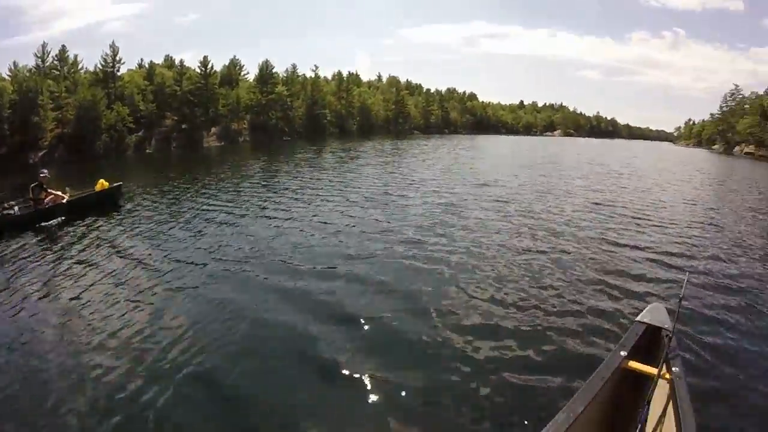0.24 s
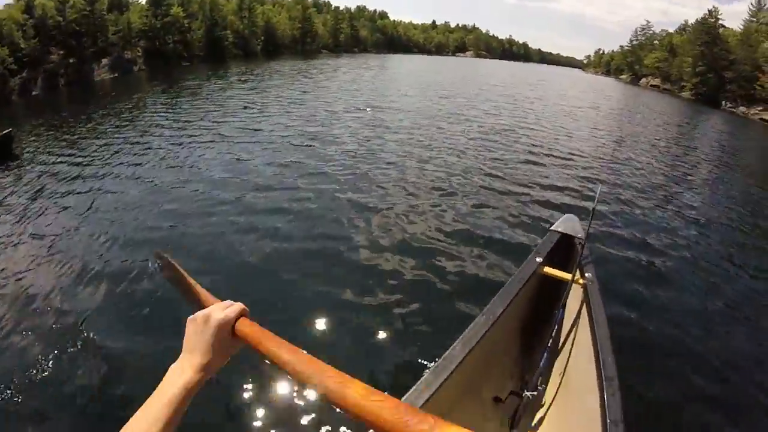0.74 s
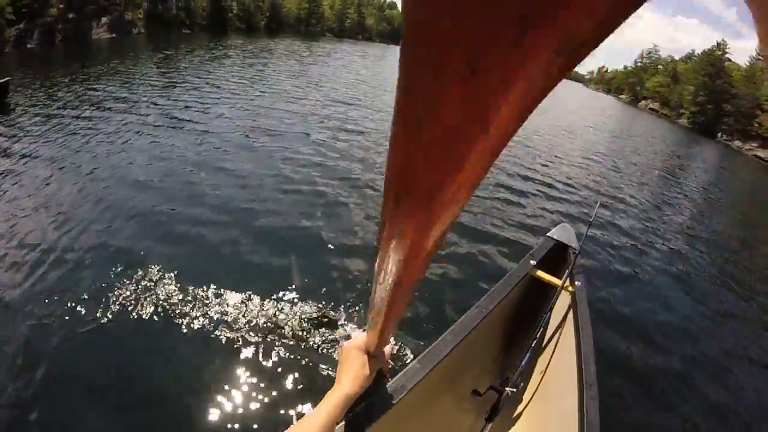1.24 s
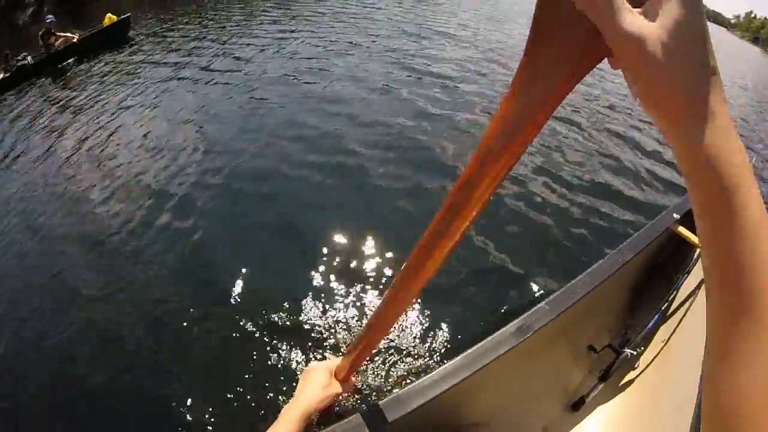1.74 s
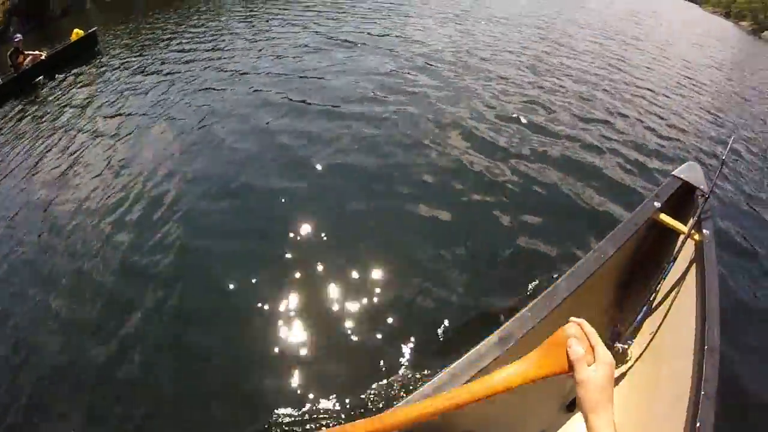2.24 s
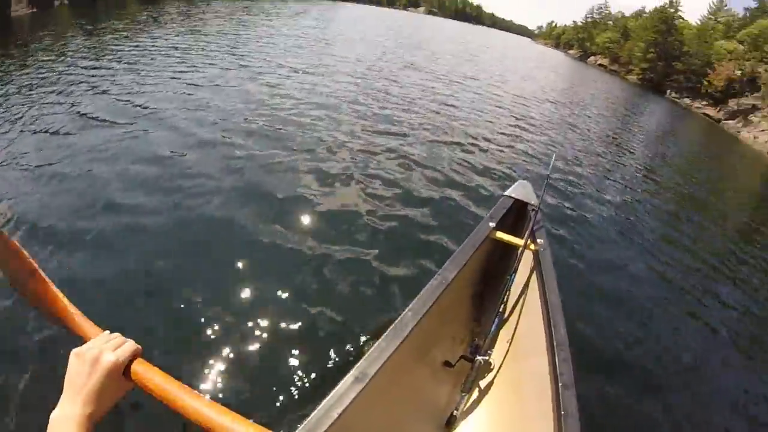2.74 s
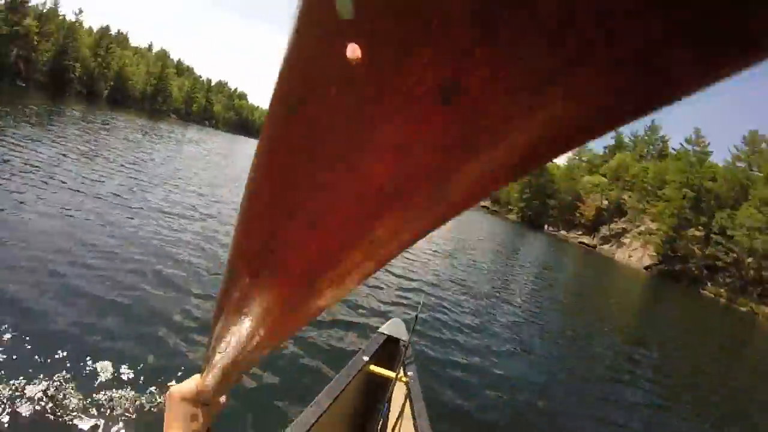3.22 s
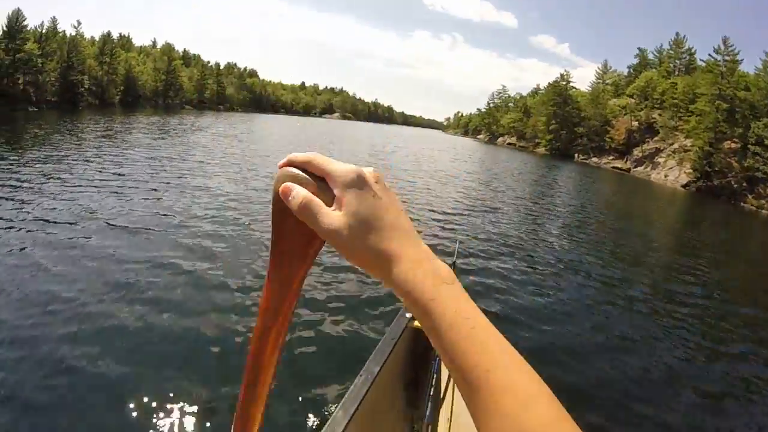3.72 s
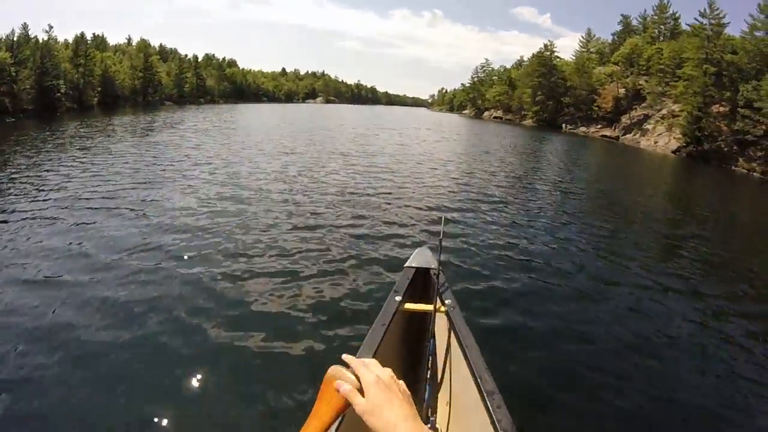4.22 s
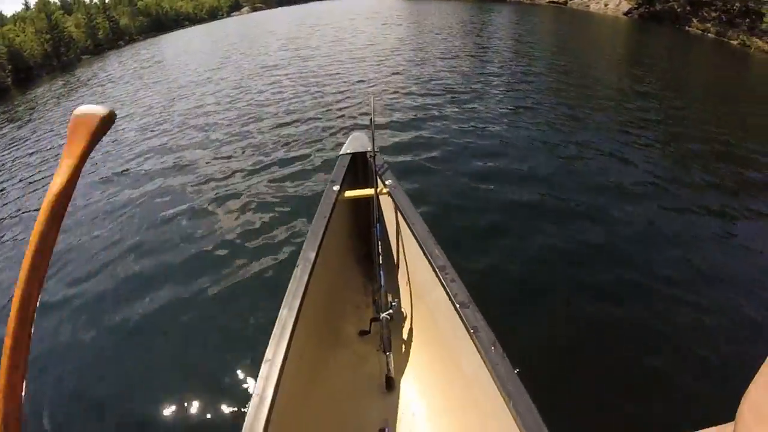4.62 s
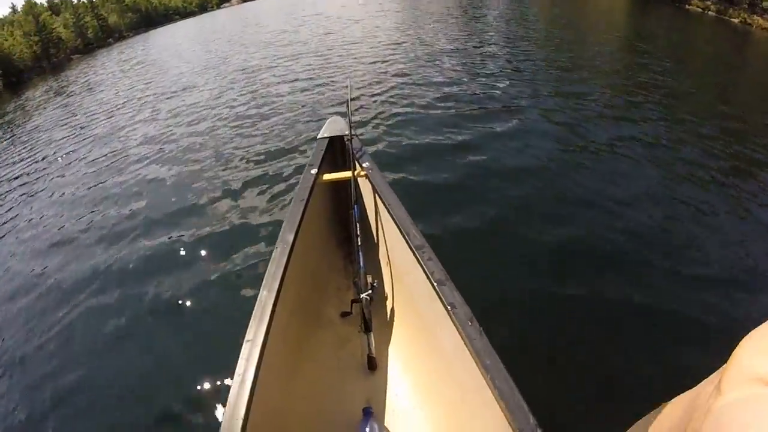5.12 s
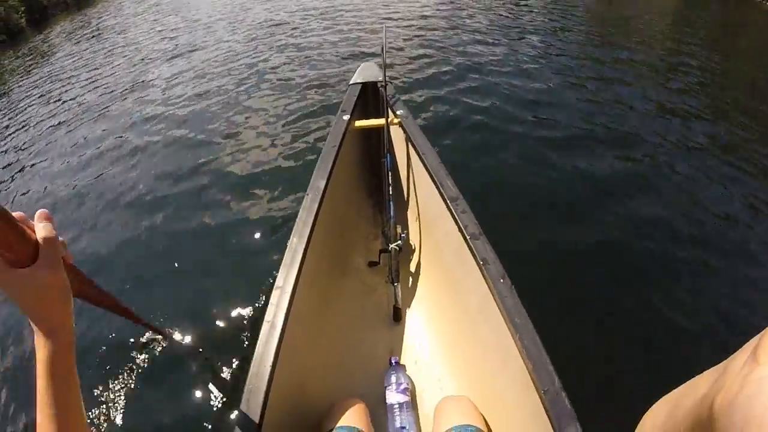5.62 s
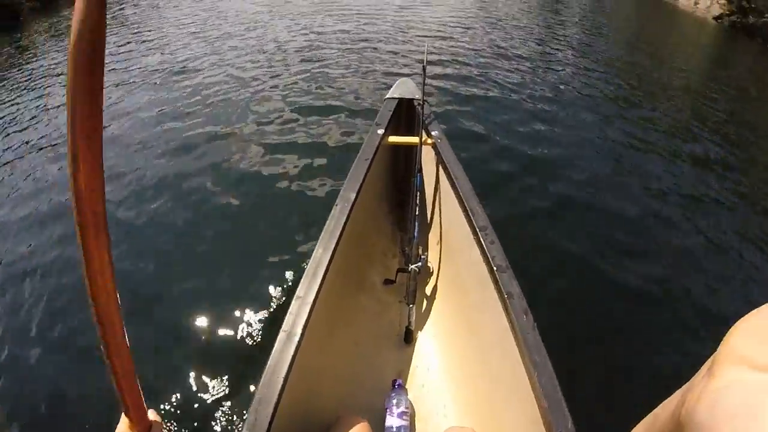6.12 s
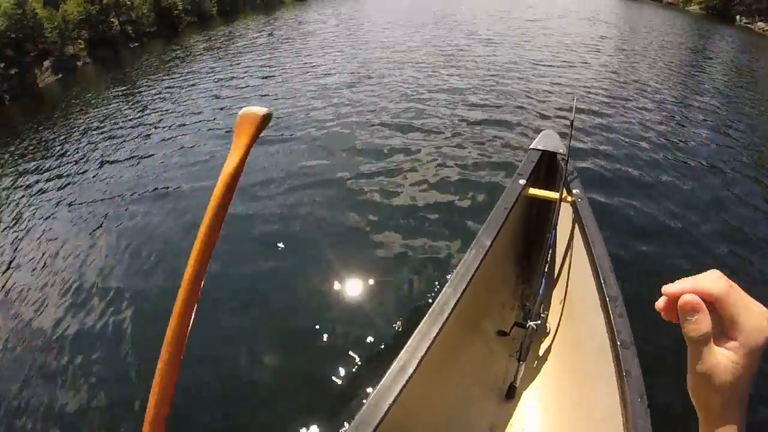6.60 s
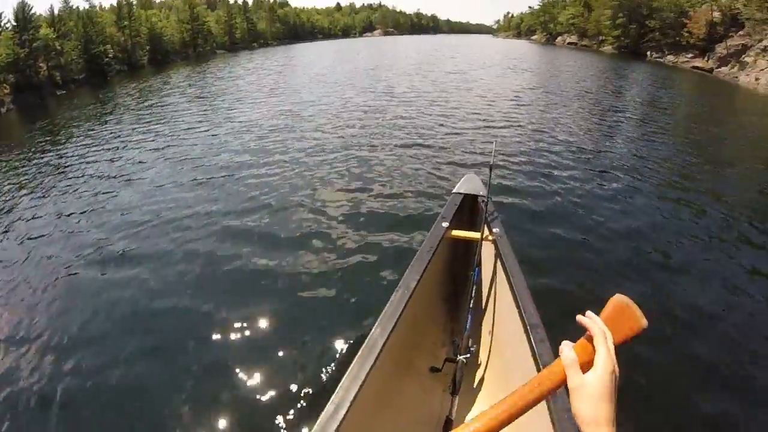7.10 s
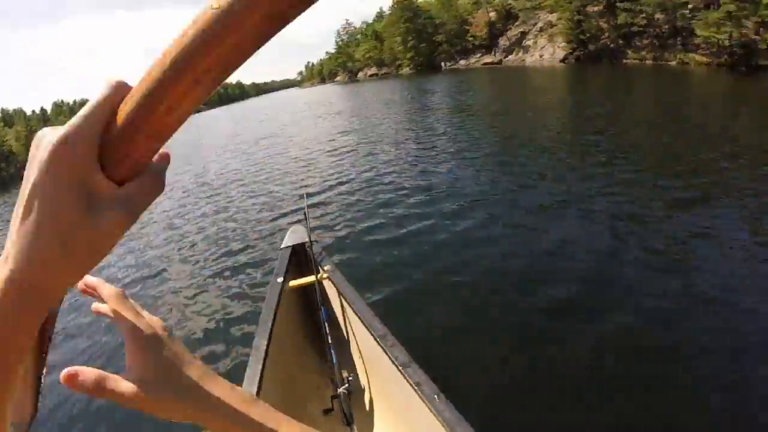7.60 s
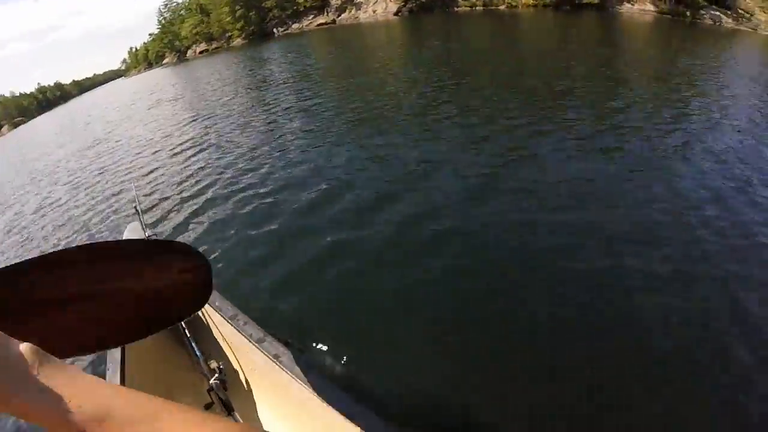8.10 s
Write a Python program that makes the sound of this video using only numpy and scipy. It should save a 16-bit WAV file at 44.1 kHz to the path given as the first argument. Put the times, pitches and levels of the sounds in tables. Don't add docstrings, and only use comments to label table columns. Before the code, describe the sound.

Steady muffled hiss and low uneven rumble fill the first three seconds, as from a sealed microphone on a moving canoe. A faint tap sounds at 0.1, tiny ticks around 0.8, a soft bump and small drips at 1.3 to 1.5, and dull bumps near 2.3. At 3.25 a hard, loud wooden blow hits with a deep pressure thump, bouncing dryly until 3.4; the hiss dips, then creeps back. A light clicking rattle runs along the hull edge from 3.9 to 4.1. From 4.6 close, gritty rubbing slides over the case, surging firmly near 4.9 and 5.25, with thumps, grabs and brief squeaks, then breaking into stuttering ticks from 5.4 to 5.95. Two sharp knocks at 6.15 and 6.18, the first loudest, end in a short brush by 6.3. Quiet hiss and rumble remain, with faint taps at 6.7, 7.1, 7.8 and 8.1.

```python
import sys
import numpy as np
from scipy import signal
from scipy.fft import rfft, irfft
from scipy.io import wavfile
from scipy.ndimage import uniform_filter1d

SR = 44100
rng = np.random.default_rng(int(sys.argv[2]) if len(sys.argv) > 2 else 0)


def wav_out(sig):
    wavfile.write(sys.argv[1], SR, np.round(np.clip(np.atleast_2d(sig).T, -1, 1) * 32767).astype(np.int16))


def volts_from_db(level):
    exponent = np.asarray(level, float) / 20
    return 10 ** exponent


N = 368235


def evened(x):
    return x / np.sqrt(np.mean(x ** 2) + 1e-20)


def add(mix, start_s, sound):
    part = mix[round(start_s * SR):][:len(sound)]
    part += sound[:len(part)]


def band(x, lo_hz, hi_hz, order=2):
    return signal.sosfilt(signal.butter(order, [lo_hz, hi_hz], "band", fs=SR, output="sos"), x)


def resonances(x, modes):
    out = 0
    for k, (hz, width_hz, db) in enumerate(modes):
        out = out + (-1) ** k * volts_from_db(db) * signal.lfilter(*signal.iirpeak(hz, hz / width_hz, SR), x)
    return out


def coloured(points):
    hz, db = np.transpose(points)
    bins_hz = np.fft.rfftfreq(N, 1 / SR)
    shape = volts_from_db(np.interp(np.log(bins_hz + 1), np.log(hz + 1), db))
    return evened(irfft(rfft(rng.standard_normal(N)) * shape, N))


# frequency in Hz, density in dB per Hz.
HISS_SPECTRUM = [(35, -31), (60, -7), (270, -9.5), (500, -13.5), (1300, -18), (3300, -25), (5000, -30.5),
                 (7500, -34.5), (11000, -42.5), (15000, -47.5), (15100, -90)]


def hiss(loud):
    level_db, recovery_db_per_s = -54.5, 18
    peak_db = 20 * np.log10(abs(loud) + 1e-5)
    fall_db = np.arange(N) * recovery_db_per_s / SR
    held_db = np.maximum.accumulate(peak_db + fall_db) - fall_db
    over_db = np.maximum(held_db + 8.5, 0)
    return volts_from_db(level_db - uniform_filter1d(over_db, size=200)) * coloured(HISS_SPECTRUM)


def felt(rows):
    s, db, jolt_db = np.transpose(rows)
    t = np.arange(N) / SR
    inside = (t >= s[0]) & (t <= s[-1])
    return inside * volts_from_db([np.interp(t, s, db), np.interp(t, s, db + jolt_db)])


# time in seconds, sway in dB, jolt in dB relative to sway.
SWAY = [(0, -46, -6.5), (0.3, -51, 1.5), (0.72, -46, -16), (1.0, -55.5, -1.5), (1.35, -46.5, -19.5),
        (2.2, -58.5, -1.5), (2.32, -51.5, -2.5), (2.75, -54.5, -7), (3.0, -42.5, -15), (3.245, -56.5, 1.5),
        (3.9, -47, -17.5), (4.08, -50, 7), (4.2, -48.5, -9.5), (4.6, -56.5, 1), (6.4, -50, -4),
        (6.9, -64, 2.5), (7.85, -49.5, -6.5), (8.35, -48.5, -29)]
# time in seconds, shove in dB, jolt in dB relative to shove.
SHOVES = [
    [(3.25, -45, -1), (3.259, -24, -9), (3.359, -31.5, -6.5), (3.41, -48, -7)],
    [(4.6, -66, -3), (4.638, -42, -2), (4.75, -43.5, -19), (4.95, -36, -8), (5.25, -48, 3),
     (5.4, -38.5, -11), (5.6, -43, 6), (5.9, -41.5, -17), (6.22, -39.5, -4.5)],
]


def rumble():
    sway, jolt = sum(felt(rows) for rows in [SWAY] + SHOVES)
    lumps = volts_from_db(4.1 * evened(band(rng.standard_normal(N), 3.3, 33, order=1)))
    deep = evened(band(rng.standard_normal(N), 8, 37) * np.sqrt(lumps))
    upper = evened(band(rng.standard_normal(N), 47.4, 130) * lumps)
    grind = evened(band(rng.standard_normal(N), 110, 283) * lumps)
    upper += volts_from_db(-9.5) * (jolt / volts_from_db(-49.5)) ** 0.2 * grind
    return sway * deep + jolt * upper


# start in seconds, peak in dB, swing in Hz (minus: pull before push),
# swings to die out.
THUMPS = [(2.285, -43, -49, 5.1), (2.332, -35.5, 76, 1.6), (3.2497, -3.5, 82, 0.34), (3.257, -19, -20, 1),
          (3.29, -34, -54, 0.8), (3.295, -18, 5.5, 0.66), (3.318, -12, -41, 0.9), (3.335, -17, -25.5, 1.2),
          (3.38, -13, -101, 0.36), (4.138, -36, -70, 1.2), (4.181, -34, 76, 0.52),
          (4.205, -34.5, -55, 0.92), (4.621, -29, -69, 0.77), (4.647, -6.5, -50, 0.32),
          (4.653, -13.5, 46, 0.95), (4.823, -32, 49, 1.4), (4.89, -29, 95, 2.5), (4.926, -21, 20, 0.79),
          (5.06, -12, 148, 0.75), (5.192, -17, -70, 0.36), (5.301, -15.5, 134, 0.51), (5.306, -17, 72, 1.8),
          (5.321, -9.5, -48, 0.4), (5.56, -21.5, -52, 0.81), (5.594, -16, -103, 0.37),
          (5.749, -33, -23.5, 3.7), (5.893, -22.5, 101, 0.62), (5.949, -19, 57, 0.3),
          (6.143, -24.5, -73, 2.3), (6.61, -39.5, 43, 4.7)]


def thumps():
    out, t = np.zeros(N), np.arange(round(.2 * SR)) / SR
    for s, db, hz, swings in THUMPS:
        turns = hz * t / (1 + 2.5 * t)
        fade = np.exp(-2.5 * abs(turns) / swings) * (1 - t / t[-1]) ** .5
        add(out, s, volts_from_db(db + 7.0) * np.sin(2 * np.pi * turns) * fade)
    return band(out, 12.0, 900, order=1)


# start in seconds, frequency in Hz, level in dB, t60 in seconds.
RINGS = [(.709, 2600, -46.5, 0.026), (0.777, 1300, -40, 0.021), (0.775, 3000, -41, 0.018),
         (.857, 1340, -46, .04), (1.227, 3130, -49, .03), (1.247, 3200, -47, 0.062),
         (1.275, 1370, -44.5, 0.073), (1.276, 6700, -40, .015), (2.285, 1325, -42, 0.056),
         (2.295, 302, -35.5, 0.061), (3.2496, 930, 3, 0.0084), (3.2502, 580, -7, .01),
         (3.2515, 3300, -13, .008), (3.25, 185, -18, .05), (5.8365, 1250, -27, .012),
         (5.8725, 1250, -23, .012), (3.3225, 1350, -24, .012), (3.383, 1500, -30, .015),
         (4.648, 330, -24, .025), (.112, 330, -42, .06), (4.293, 2650, -49, .02), (4.325, 2450, -51, .04),
         (4.0655, 800, -32, .01), (.11, 2300, -42, .04), (4.3, 1950, -50, .04), (3.252, 2040, 5.5, 0.0084),
         (3.253, 1915, -38, 0.45), (3.276, 3500, -23.5, 0.01), (3.3805, 970, -22, 0.0138),
         (3.476, 1300, -53.5, 0.09), (4.188, 304, -38, 0.065), (5.0615, 650, -19, .012),
         (6.149, 1665, -10, 0.03), (6.1845, 1670, -8, 0.044), (6.181, 8450, -22.5, 0.012),
         (6.186, 1916, -49, .4), (6.743, 2300, -52, 0.049), (8.04, 2600, -48, .02)]
# start in seconds, frequency in Hz, level in dB, t60 in seconds.
DRIPS = [
    (1.268, 2600, -45, 0.036),
    (1.319, 2550, -46, .03),
    (1.322, 1350, -45, .04),
    (1.345, 2600, -49, .03),
    (1.365, 1300, -48, .03),
    (1.392, 3000, -52, .03),
    (1.475, 3200, -54, .03),
]


def rings():
    out, t = np.zeros(N), np.arange(SR // 2) / SR
    for s, hz, db, t60_s in RINGS + DRIPS:
        envelope = volts_from_db(db - 60 * t / t60_s) * (1 - np.exp(-t / 0.00082))
        add(out, s, envelope * np.sin(2 * np.pi * hz * t))
    return out


# start in seconds, length in seconds, level in dB, frequency in Hz,
# width in Hz.
SQUEALS = [(4.622, .042, -49, 8300, 500), (4.815, .05, -56, 8200, 600), (4.897, .036, -46, 8500, 500),
           (5.225, .04, -51, 8400, 500), (6.2, .055, -63, 8400, 600), (4.69, .045, -44, 4100, 300),
           (4.7, .035, -46, 3450, 400), (4.775, .035, -48, 4100, 400), (5.522, .022, -35, 1780, 300),
           (5.558, .014, -33, 1750, 300), (5.6, .04, -40, 1750, 300), (5.648, .016, -39, 1750, 300),
           (3.2505, .003, -42, 12500, 3000), (3.312, .014, -42, 3900, 1200), (3.273, .012, -41, 3600, 900)]


def squeals():
    out = np.zeros(N)
    for s, length_s, db, hz, width_hz in SQUEALS:
        t = np.arange(0, length_s, 1 / SR)
        noise = rng.standard_normal(SR // 5)[:len(t)]
        mode = [(hz, width_hz, 0)]
        swell = np.sin(np.pi * t / length_s) ** .6
        add(out, s, volts_from_db(db) * swell * evened(resonances(resonances(noise, mode), mode)))
    return out


def slips(clump_db):
    return rng.standard_normal(N) * volts_from_db(clump_db * evened(band(rng.standard_normal(N), 36, 220, order=1)))


def drifting(modes, drift_db):
    drive, out = slips(2.6), 0
    for hz, width_hz, db in modes:
        once = resonances(drive, [(hz, 1.4 * width_hz, 0)])
        twice = resonances(once, [(hz, 1.4 * width_hz, db)])
        out = out + twice * volts_from_db(drift_db * evened(band(rng.standard_normal(N), 2.6, 18, order=1)))
    return out


# frequency in Hz, width in Hz, level in dB.
CASE_UPPER = [(2361, 150, -8.5), (2620, 450, -7.5), (2130, 680, -16)]
CASE_LOWER = [(1774, 178, 1), (1300, 300, -7.5)]
CASE_FIZZ = [(2980, 450, 14), (4195, 400, 7), (4680, 410, 3), (5840, 350, 6)]
CASE_SIZZLE = [(7030, 880, -5), (8450, 320, 0), (8860, 340, -2.5), (11100, 1300, -14), (13900, 2400, -21.5)]


def rubbed_layers():
    low = slips(1.9)
    upper = band(drifting(CASE_UPPER, 1.7), 2200, 2590)
    lower = resonances(low, CASE_LOWER) + volts_from_db(-13) * band(low, 800, 1350)
    fizz = band(drifting(CASE_FIZZ, 1.8), 3160, 5500)
    sizzle = band(drifting(CASE_SIZZLE, 2.5), 6500, 16000)
    broad = band(slips(2.5), 1000, 3000, order=3)
    return [evened(layer) for layer in (upper, lower, fizz, sizzle, broad)]


# time in seconds, pressure in dB, grit in dB.
SCUFFS = [
    [(3.256, -40, -10), (3.27, -39.5, -2), (3.3, -54, -26), (3.312, -47, 2), (3.328, -44, 2),
     (3.333, -50, -10), (3.366, -59, -24)],
    [(3.386, -47, -8), (3.4, -66, -9), (3.42, -67, -4)],
    [(3.875, -59, -15), (3.895, -55, -33), (3.93, -63, -19), (3.99, -66, -24), (4.04, -57, -34),
     (4.1, -63, -23), (4.125, -66, -15)],
]
SLIDES = [
    [(4.62, -28, -30), (4.64, -29, -19), (4.665, -44, 1), (4.69, -46.5, -2), (4.72, -37.5, 0.5),
     (4.74, -39.5, -16), (4.79, -42.5, -0.5), (4.812, -45, -16)],
    [(4.812, -42, -20), (4.83, -31.5, -20), (4.86, -36, -8), (4.89, -29.5, -15), (4.915, -26.5, -24),
     (4.932, -23.5, -24), (4.945, -43, 1)],
    [(4.945, -39, -5.5), (4.98, -40.5, -6), (5.03, -36.5, -7.5), (5.085, -43.5, -1), (5.095, -44.5, -11),
     (5.14, -47.5, -16), (5.185, -58, -9)],
]
DRAGS = [
    [(5.185, -34, -7), (5.205, -29.5, -25), (5.24, -26, -11), (5.27, -26, -24), (5.3, -28.5, -11),
     (5.335, -52, -37)],
    [(5.335, -49, -36), (5.36, -47, -3.5), (5.4, -42, -6), (5.425, -35.5, -10), (5.445, -52, -7),
     (5.47, -52, -1), (5.5, -63, -4)],
    [(5.5, -60, 0), (5.535, -43, -13), (5.56, -39, -8), (5.58, -52, -14), (5.605, -46, -13),
     (5.66, -53, -14), (5.68, -65, -19), (5.712, -56, -12), (5.74, -70, 0)],
]
BRUSHES = [
    [(5.84, -60, -17), (5.865, -66, -17), (5.905, -45, -13)],
    [(6.058, -48, -11), (6.072, -43, -18), (6.09, -63, -4.5), (6.133, -45, -18), (6.147, -30, -25.5)],
    [(6.156, -56, -9), (6.17, -43.5, -12), (6.184, -35, -20)],
    [(6.192, -25, -47), (6.21, -30, -50.5), (6.254, -44.5, -17.5), (6.26, -66, -4), (6.31, -82, 8)],
]


def rubbing():
    layers = rubbed_layers()
    levels = np.zeros((len(layers), N))
    usual_db, usual_grit_db = -42, -12
    # strokes, lower resonance dB, sizzle dB
    kinds = [(SCUFFS, 1.2, -20.5), (SLIDES, -1, -20.5), (DRAGS, -1.5, -22.5), (BRUSHES, -2, -20)]
    for strokes, low_db, sizzle_db in kinds:
        for rows in strokes:
            s, db, grit_db = np.transpose(rows)
            t = np.arange(s[0], s[-1], 1 / SR)
            edge = np.clip(np.minimum(t - s[0], s[-1] - t) / 0.0017, 0, 1)
            firm, gritty = db - usual_db, grit_db - usual_grit_db
            extras_db = [0 * db,
                         low_db - 0.3 * firm + 0.26 * gritty,
                         grit_db,
                         sizzle_db - 0.025 * firm + .3 * gritty,
                         -12 - .4 * firm + .3 * gritty]
            for level, extra_db in zip(levels, extras_db):
                add(level, s[0], edge * volts_from_db(np.interp(t, s, db + extra_db)))
    return sum(level * layer for level, layer in zip(levels, layers))


def taps(rows, shell, t60_s, body_db, rise_s, unpitched):
    out, t = np.zeros(N), np.arange(round(.06 * SR)) / SR
    chatter = rng.standard_normal((len(rows), len(t)))
    hz, mode_db = np.transpose(shell)[:, :, None]
    fade = volts_from_db(-60 * t / t60_s) * (1 - np.exp(-t / rise_s))
    for (s, db, low_db, edge_db), noise in zip(rows, chatter):
        modes = volts_from_db(mode_db) * np.sin(2 * np.pi * hz * (1 + 0.03 * noise[:len(hz), None]) * t)
        modes *= fade * (1 + 0.37 * evened(band(noise, 130, 634)))
        modes = band(modes, 830, 2940, order=4)
        crack = unpitched * evened(band(noise, 900, 2770, order=4)) * fade
        bright = band(resonances(noise * fade ** 1.13, CASE_FIZZ + CASE_SIZZLE), 3300, 21000)
        parts = [modes[:2].sum(0) + crack, modes[2:].sum(0), bright, band(noise * fade, 300, 1110)]
        upper, lower, edge, body = (p / np.abs(p).max() for p in parts)
        dull = volts_from_db(body_db - 3 + 0.64 * low_db) * body
        add(out, s - .001, volts_from_db(db) * (upper + volts_from_db(low_db) * lower + volts_from_db(edge_db - 2) * edge + dull))
    return out


# frequency in Hz, level in dB. Hull, hull rim, free case,
# case damped by the hand.
HULL = [(2450, -7), (2910, -7.5), (1327, 8), (1950, 4.5)]
RIM = [(2650, 1), (2850, -2), (1250, 0), (1900, -1)]
CASE_RING = [(2405, -3), (2667, -9), (1794, 1.5), (1510, 0)]
CASE_HELD = [(2450, 0), (2750, -5), (1780, 0), (1350, -7)]
# start in seconds, peak in dB, lower resonance in dB and bright edge in dB, both relative.
BUMPS = [(0.11, -40.5, 1, -8), (1.276, -41, -3.5, 11.5), (2.284, -45.5, 8.5, -10), (2.332, -51.5, 9, -4),
         (2.952, -55.5, 11, -7), (4.168, -45.5, 2, -9.5), (4.308, -45, -11, -26), (4.572, -48.5, -2, 6),
         (6.719, -47, -6, -10), (7.112, -52, 0, -12), (2.48, -54, 0, -10), (2.62, -54, 0, -10),
         (7.81, -54, 0, -10), (8.124, -38.5, -6, -16)]
BLOW = [(3.2505, -15, 3, -6), (3.2525, -7, -3.5, -7), (3.262, -34, 9, -7), (3.277, -25, -7, -5),
        (3.288, -35, 8, -15), (3.3228, -20.5, 0.5, -11), (3.34, -39, 15, -13), (3.37, -45, -4, -26),
        (3.38, -19, 2, -10), (3.391, -37.5, 0.5, -10), (3.2585, -26, -3, -14), (3.266, -29, 0, -10),
        (3.295, -36, 2, -15), (3.409, -44, -3, -6)]
RATTLE = [(3.881, -35, 1.5, -22.5), (3.994, -38, -4.5, -11), (4.014, -35, -2, -21), (4.033, -38, -2, -21),
          (4.04, -33, 1.5, -16), (4.056, -34, -4, -17), (4.066, -26, 3, -16), (4.081, -29.5, 0, -19),
          (4.102, -23.5, -11, -24), (3.888, -40, -3, -28), (3.894, -41, 0, -28), (3.901, -45, 0, -28),
          (3.909, -45, 2, -28), (3.922, -47, -4, -28), (3.928, -46, 4, -24), (3.943, -49, 2, -24),
          (4.047, -46, 0, -24), (4.0615, -34, 0, -22), (4.113, -42, -6, -24)]
KNOCKS = [
    (4.632, -40, -17, -23),
    (4.649, -13.5, 0.5, -7.5),
    (5.993, -37, 8, -15),
    (6.1464, -2, -12, -22),
    (6.1838, -9, 0, -15),
]
TICKS = [(5.0621, -21.5, 8.5, -12), (5.196, -14, -9, -36), (5.223, -16, -2, -8), (5.308, -28.5, 13, 4),
         (5.466, -23.5, -3, -23), (5.478, -29, 1, -9), (5.486, -38.5, 8, -8), (5.5115, -32, -3, -13),
         (5.525, -34, 4, -6), (5.546, -21, 0.5, -25), (5.572, -19.5, -1, -20), (5.596, -24, 7, -5),
         (5.621, -36, 4, 1), (5.6435, -32, 15, -9), (5.65, -32, -1, -6), (5.673, -46, 5, -14),
         (5.7098, -13, -5, -15), (5.803, -42, 0, -14), (5.8368, -16.5, -5, -15), (5.8398, -22, -3, -12),
         (5.8548, -35, 0, -23), (5.8726, -15, -1, -17), (5.8932, -22, -4, -14), (5.947, -22, -9.5, -23),
         (6.054, -15.5, -5, -14)]
GRABS = [(4.711, -32, -5, -6), (4.7185, -29, -5, -8), (4.747, -32, 0, -10), (4.8195, -28, -2, -14),
         (4.873, -25, -2, -15), (4.9, -19, -5, -16), (4.905, -19, -5, -16), (4.962, -30, 3, -12),
         (4.9995, -26, 0, -12), (5.12, -32, 0, -20), (5.168, -39, 4, -18), (5.347, -40, -3, -8),
         (5.367, -35, 3, -10), (5.4045, -28, -2, -14), (5.863, -42, 0, -14), (5.8795, -35, -6, -14),
         (5.8995, -37, -6, -14)]


def struck():
    return (taps(BUMPS, HULL, t60_s=.022, body_db=4.5, rise_s=.0006, unpitched=.4)
            + taps(BLOW, HULL, t60_s=.0098, body_db=-1, rise_s=.0006, unpitched=.6)
            + taps(RATTLE, RIM, t60_s=.011, body_db=-2, rise_s=.0006, unpitched=.1)
            + taps(KNOCKS, CASE_RING, t60_s=.014, body_db=-11, rise_s=.0004, unpitched=.2)
            + taps(TICKS, CASE_HELD, t60_s=.01, body_db=-8.5, rise_s=.0007, unpitched=.6)
            + taps(GRABS, CASE_RING, t60_s=.01, body_db=-8.5, rise_s=.0007, unpitched=.6))


def scene():
    contact = rubbing() + squeals() + struck() + rings() + thumps()
    return (contact + rumble() + hiss(contact))[None]


def low_pass(x):
    return signal.sosfilt(signal.butter(12, 16390, fs=SR, output="sos"), x)


def record(dry):
    limited = 1.409 * np.tanh(dry / 1.57)
    smooth = signal.oaconvolve(limited, signal.firwin(511, 15800, fs=SR)[None], "same")
    return low_pass(smooth)


dry = scene()
out = record(dry)
wav_out(out)
```